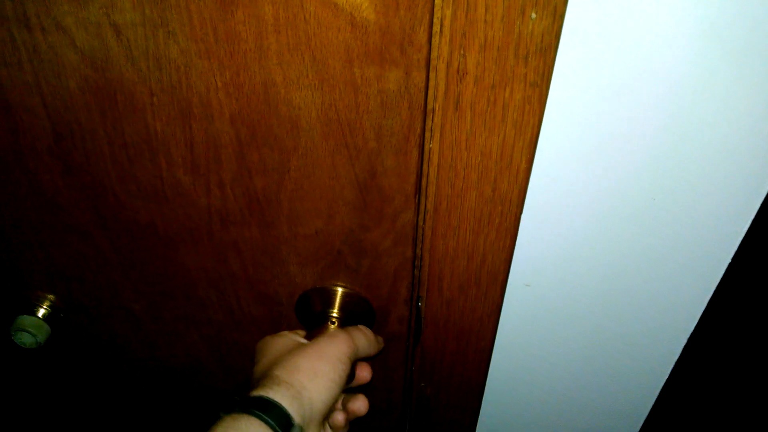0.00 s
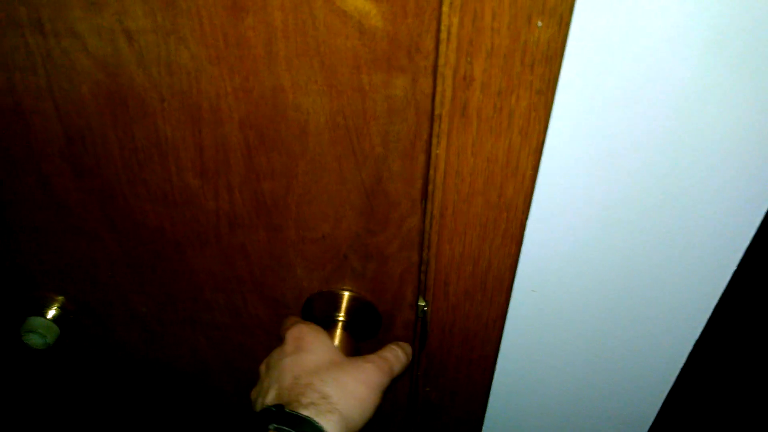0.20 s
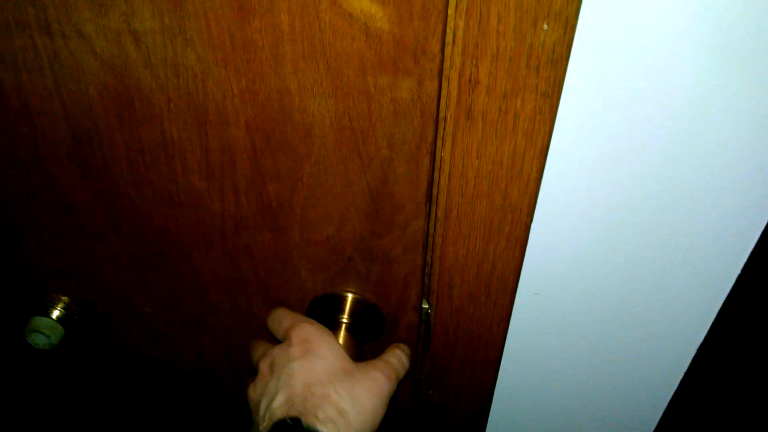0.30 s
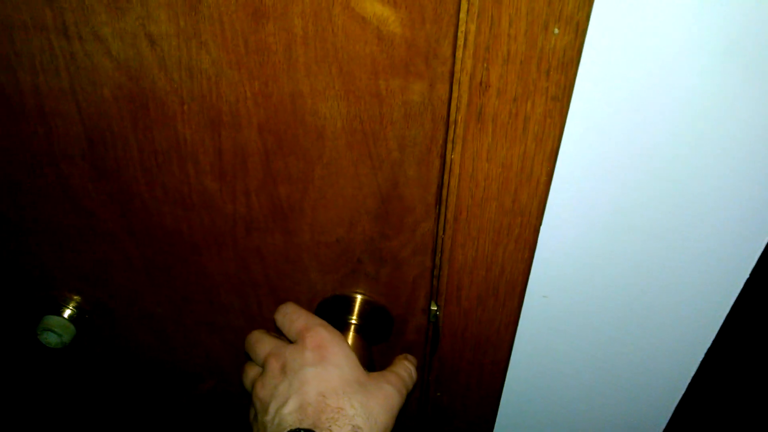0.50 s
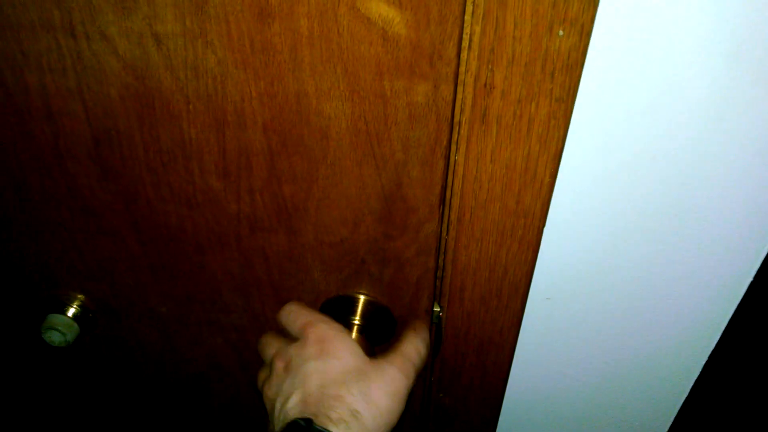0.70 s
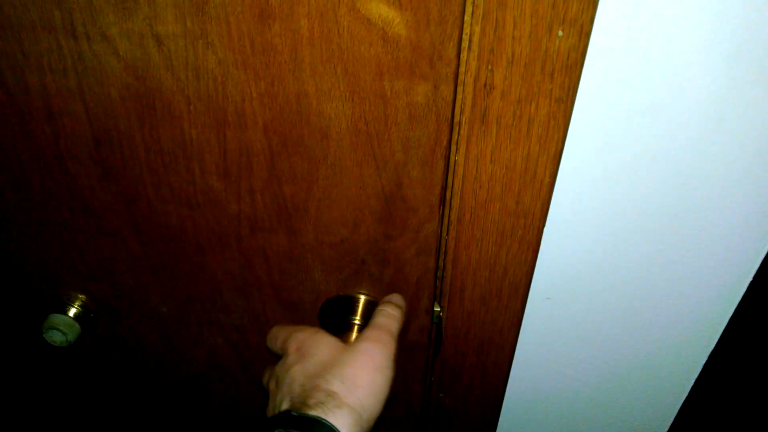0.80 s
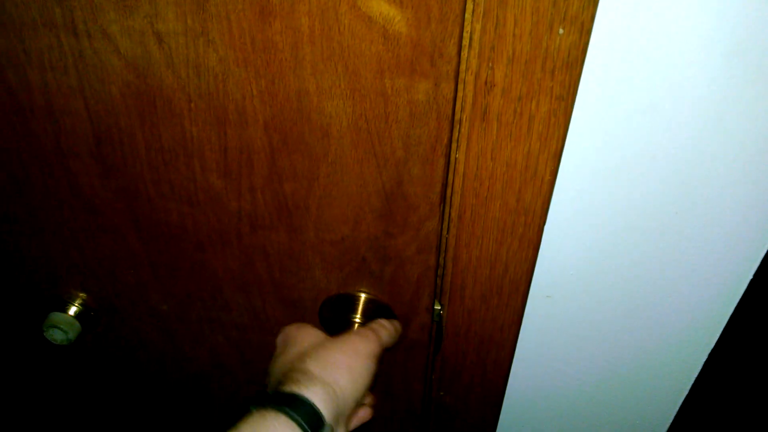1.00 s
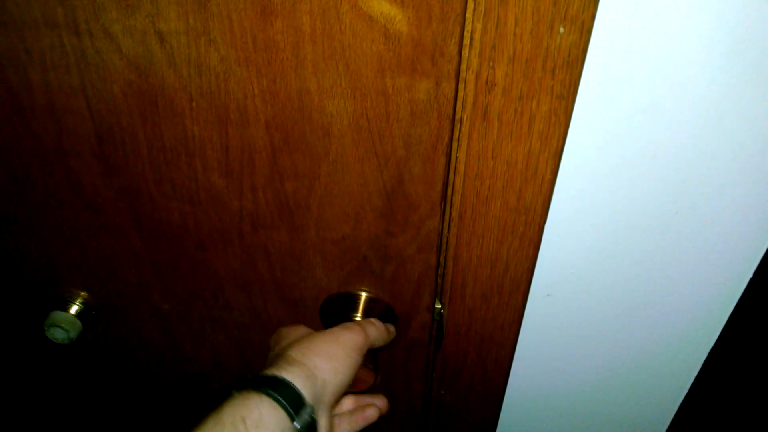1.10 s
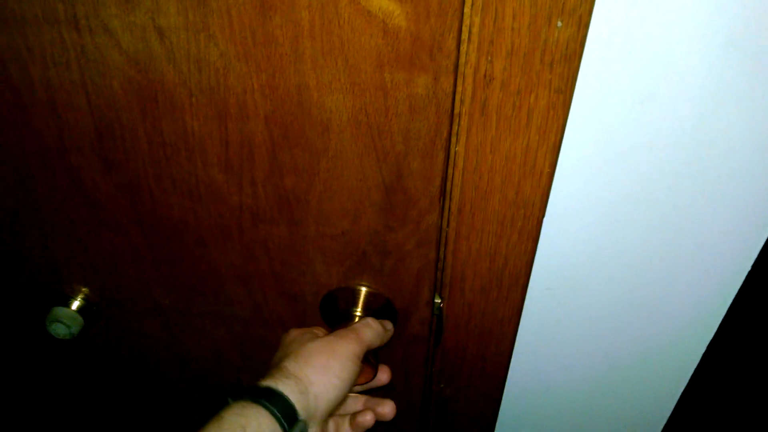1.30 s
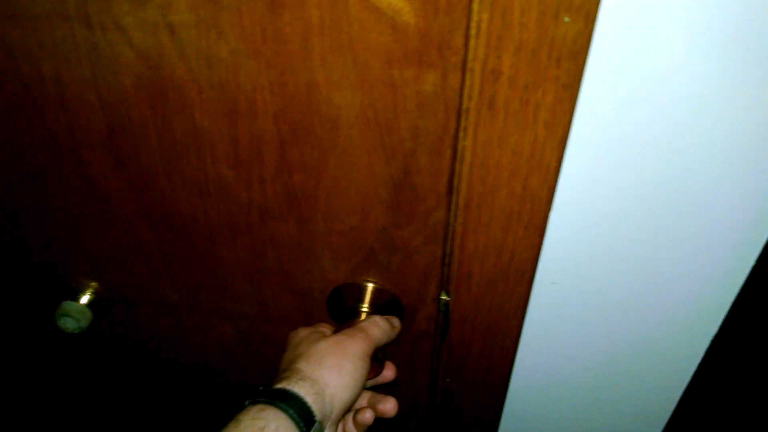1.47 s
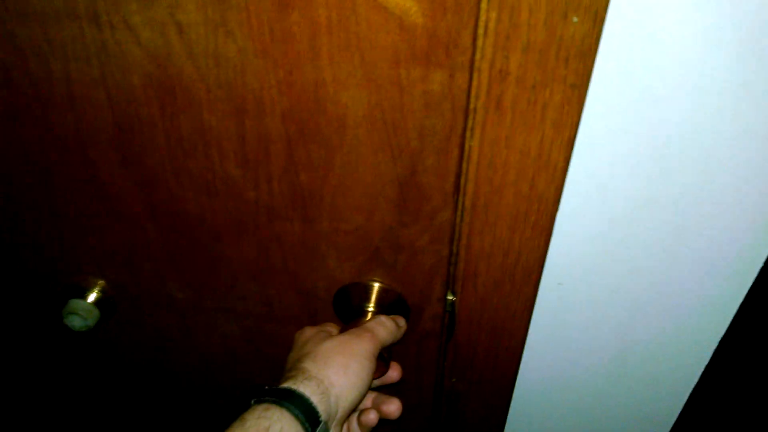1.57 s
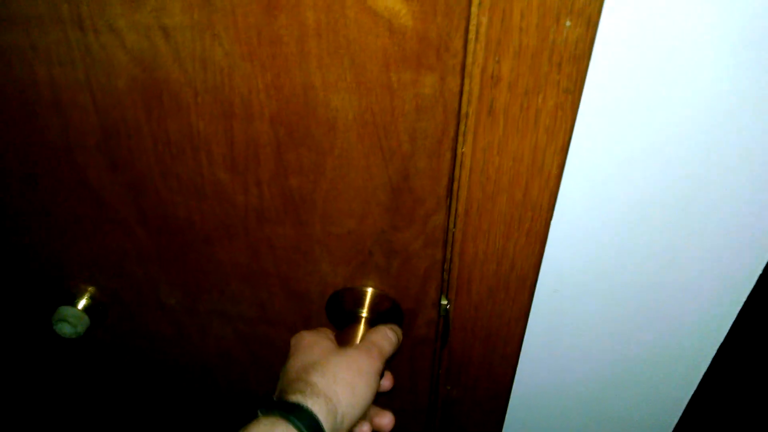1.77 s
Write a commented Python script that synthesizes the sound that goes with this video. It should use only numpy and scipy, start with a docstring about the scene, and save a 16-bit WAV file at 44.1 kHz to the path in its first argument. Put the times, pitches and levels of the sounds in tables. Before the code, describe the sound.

A brass doorknob on a stuck wooden door is worked close by in a small hallway, over steady low rumble and faint hiss. Light ticks and scraping start around 0.1 s; the latch snaps very loudly at 0.25 s, with a woody shudder and short echoes. After a quiet gap with faint ticks near 1.1 s, the knob rattles from 1.23 s, the bolt knocks at 1.46 s, and dull bumps end near 1.75 s.

```python
"""A brass knob is turned on a stuck wooden door, close by, in a small hallway.
A light tick and a rattle come first, over a steady room rumble and hiss; all of this hum is shaped noise.
Then the latch snaps once, hard, and the door shudders: damped sines, a sharp crack, echoes and a noisy ring.
About a second later the knob rattles and the bolt knocks in its plate, again ringing sines and noise.
Small ticks, dull bumps and the spindle's faint scrape, all from noise, lie around both moments."""
import sys
import numpy as np
from scipy import signal
from scipy.fft import rfft, irfft, next_fast_len
from scipy.io import wavfile

SR = 44100
rng = np.random.default_rng(int(sys.argv[2]) if len(sys.argv) > 2 else 0)


def generate_wav(signal):
    """Clip the signal to [-1, 1] and save it as 16-bit WAV at the path in sys.argv[1]."""
    frames = np.transpose(np.atleast_2d(signal))
    scaled = np.clip(frames, -1, 1) * 32767
    pcm = np.round(scaled).astype(np.int16)
    wavfile.write(sys.argv[1], SR, pcm)


N = 79380  # samples

# how alike the hallway's sound is at the two microphones: f/Hz, left-right correlation
HALL_LIKENESS = [(60, -0.35), (130, .3), (300, 0.72), (700, 0.77), (1400, 0.94), (3100, -0.41),
                 (8000, 0.27), (15000, 0.21)]
ONSET_S = 0.0005  # time constant with which every noisy ring and tap sets in


def amp(db):
    """Decibels to gain."""
    return 10 ** (np.asarray(db) / 20)


def seconds():
    """The time of each sample."""
    return np.arange(N) / SR


def fade(t60):
    """An exponential decay that falls 60 dB in t60 seconds."""
    return amp(-60 * seconds() / np.maximum(t60, .0005))


def rise(time_constant):
    """An exponential approach from silence to full level."""
    return 1 - np.exp(-seconds() / time_constant)


def along(points, hz):
    """(Hz, value) points read on a log frequency axis."""
    f, value = np.transpose(points)
    return np.interp(np.log(hz + 1), np.log(f + 1), value)


def filtered(x, response):
    """x shaped by a complex response of frequency."""
    m = next_fast_len(N + SR // 10)
    spectrum = rfft(x, m) * response(np.fft.rfftfreq(m, 1 / SR))
    return irfft(spectrum, m)[..., :N]


def at(s, x):
    """x delayed so that it starts at s seconds."""
    return np.pad(x, ((0, 0), (max(round(s * SR), 0), 0)))[:, :N]


def toward_right(db):
    """Gains that lower the left microphone and raise the right by db each."""
    return amp([[-db], [db]])


def noise(spectrum, alike):
    """Coloured stereo noise of rms 1; the mid-side balance sets how alike the microphones are."""
    def mid_side(hz):
        turn = np.arccos(np.clip(along(alike, hz), -1, 1)) / 2
        return amp(along(spectrum, hz)) * np.array([np.cos(turn), np.sin(turn)])

    mid, side = filtered(rng.standard_normal((2, N)), mid_side)
    pair = np.array([mid + side, mid - side])
    return pair / np.sqrt(np.mean(pair ** 2))


def ring(modes):
    """Damped sines struck at time zero, as each microphone hears them."""
    skew_rad = 0.36  # phase shift at each microphone, in opposite senses
    out = np.zeros((2, N))
    for i, (hz, db, t60) in enumerate(modes):
        skew = skew_rad * (-1) ** i
        phase = 2 * np.pi * hz * seconds() + np.array([[-skew], [skew]])
        out += amp(db) * fade(t60) * np.sin(phase)
    return out


def crack():
    """The bare contact: one very short push and pull."""
    n = np.arange(N)
    push = np.exp(-n / 2) * np.sin(n * np.pi / 4 + np.pi / 4)
    return np.diff(push, prepend=0)


def direct(x):
    """Sound straight from the lock reaches the right microphone first."""
    right_lead_s = .000022
    return filtered(x, lambda hz: np.exp(np.outer([-1j, 1j], np.pi * hz * right_lead_s)))


def diffuse(spectrum, damping=1):
    """Dense ringing of door and hallway; the bass builds slowly and the treble dies first."""
    # early reverberation of the hallway before damping: f/Hz, t60/s
    hall = [(100, 0.28), (400, 0.18), (1200, 0.16), (3000, 0.14), (8000, 0.12), (15000, 0.079)]
    late_db, late_stretch = -16.5, 4.13  # late part: its level, and how many times longer than hall
    chatter_db, chatter_per_s = 1, 360  # loose parts make the ringing uneven: spread, new levels a second
    build_cycles = 4.8  # time constant, in cycles, with which each pitch fills the door and hallway
    knots = rng.standard_normal(N // 10)
    chatter = amp(chatter_db * np.interp(seconds() * chatter_per_s, np.arange(len(knots)), knots))
    hz, t, z = signal.stft(noise(spectrum, HALL_LIKENESS) * chatter, SR, nperseg=256)
    fall_db = -60 * t / along(hall, hz)[:, None]
    decay = amp(damping * fall_db) + amp(late_db + fall_db / late_stretch)
    # half a bin and half a hop are added so that nothing starts at exactly zero
    build = 1 - np.exp(-np.outer(hz + hz[1] / 2, t + t[1] / 2) / build_cycles)
    ringing = signal.istft(z * decay * build, SR, nperseg=256)[1][:, :N]
    return ringing * rise(ONSET_S)


def taps(events, spectrum, t60):
    """Light contacts: bursts of coloured noise that die away quickly."""
    out = np.zeros((2, N))
    for s, db in events:
        burst = noise(spectrum, HALL_LIKENESS) * fade(t60) * rise(ONSET_S)
        out += amp(db) * at(s, burst)
    return out


def strikes(events, modes, spectrum, crack_db, ring_db, damping=1):
    """Each contact rings a body anew, its modes 1 dB uneven, low-passed at the contact's brightness."""
    out = np.zeros((2, N))
    for s, db, bright_hz in events:
        struck = [(hz, level + rng.normal(0, 1), t60) for hz, level, t60 in modes]
        blow = direct(ring(struck) + amp(crack_db) * crack())
        blow = blow + amp(ring_db) * diffuse(spectrum, damping)

        def dulling(hz):
            return 1 / (1 + np.sqrt(2) * 1j * hz / bright_hz - (hz / bright_hz) ** 2)

        out += amp(db) * filtered(at(s, blow), dulling)
    return out


def room_floor():
    """The room's rumble and hiss, steady noise at both microphones."""
    # colour of the empty hallway: f/Hz, relative level/dB per Hz
    floor_colour = [(20, -4), (45, -1), (80, 4.5), (115, -13), (160, -1), (260, -6), (330, -4), (450, -9.5),
                    (620, -12), (900, -21), (1700, -26), (2200, -32), (2550, -48), (3200, -24.5),
                    (5000, -34), (6500, -30), (10000, -32.5), (12500, -28.5), (14300, -27), (15500, -32.5)]
    # how alike the microphones hear it: f/Hz, left-right correlation
    floor_likeness = [(30, 0.22), (70, -0.47), (130, 0.25), (290, 0.46), (640, 0.71), (1410, 0.74),
                      (3100, -0.29), (7000, 0.024), (15000, 0.023)]
    return amp(-47) * noise(floor_colour, floor_likeness) * toward_right(0.07)


def sway():
    """The whole door rocks slowly and pushes the air: one low damped sine per sway."""
    # sways of the door: t/s, level/dB ahead of the tilt to the right
    sways = [(0.248, -39), (1.438, -36.5)]
    sway_hz, sway_t60_s, sway_rise_s = 26.9, 0.603, .02
    swing = direct(ring([(sway_hz, 0, sway_t60_s)]) * rise(sway_rise_s))
    return sum(amp(db) * at(s, swing) for s, db in sways) * toward_right(2.5)


def bumps():
    """The door bumps dully in its frame: short bursts of low noise."""
    # bumps: t/s, level/dB
    bump_events = [(.258, -32.5), (.335, -39), (.385, -47), (.46, -64), (.535, -59), (1.36, -39),
                   (1.515, -39.5), (1.558, -45.5), (1.721, -32.5), (1.731, -36), (1.762, -37)]
    # colour of a bump: f/Hz, relative level/dB per Hz
    bump_colour = [(25, 12), (70, -18.5), (110, -12), (160, 10), (260, -10), (550, -4.5), (900, -26),
                   (2500, -33), (8000, -50)]
    return taps(bump_events, bump_colour, t60=0.091)


def ticks():
    """Light brass ticks in the knob: short bursts of bright noise."""
    # ticks: t/s, level/dB
    tick_events = [(.115, -46), (.222, -69), (.357, -50), (1.115, -52), (1.363, -50), (1.4435, -43.5),
                   (1.448, -43.5)]
    # colour of a tick: f/Hz, relative level/dB per Hz
    tick_colour = [(200, -12), (2000, -14), (4200, -2), (6000, -4), (9500, -2), (12500, -1), (14200, -1),
                   (16000, -3)]
    return taps(tick_events, tick_colour, t60=.035)


def scrape():
    """The spindle slides brass on brass: thin noise in short swells."""
    # scrapes: t/s, length/s, level/dB at the height of the swell
    scrapes = [(0.197, 0.15, -50), (0.337, 0.071, -56), (1.099, .05, -57), (1.34, 0.077, -62),
               (1.69, 0.19, -57.5)]
    # colour of the scraping: f/Hz, relative level/dB per Hz
    scrape_colour = [(500, -22), (6000, -21), (12500, 1), (14200, 14), (16000, -13)]
    swell = np.zeros(N)
    for s, length, db in scrapes:
        progress = np.clip((seconds() - s) / length, 0, 1)
        swell += amp(db) * np.sin(np.pi * progress)
    return swell * noise(scrape_colour, HALL_LIKENESS)


def rattle():
    """The loose knob takes up its play on the spindle, damped by the hand."""
    # rattles: t/s, level/dB, brightness f/Hz
    rattles = [(.173, -52, 5060), (.2235, -46.5, 5000), (.387, -49, 3000), (1.2325, -50, 4400),
               (1.241, -47.5, 2200), (1.358, -41, 2570), (1.364, -40.5, 2500), (1.374, -36, 1300),
               (1.3985, -41, 2940), (1.4025, -37.5, 1580), (1.592, -57, 2170), (1.693, -55.5, 2000)]
    # modes of the gripped knob: f/Hz, level/dB, t60/s
    knob_modes = [(870, 1, 0.036), (957, -4.5, .025), (1244, 3.5, 0.013), (1536, -1.5, 0.0089),
                  (1920, 4, 0.0073), (3300, 9, 0.0022)]
    # colour of the knob's noisy ring: f/Hz, relative level/dB per Hz
    knob_colour = [(60, -18), (200, -14), (500, 5), (860, -4.5), (1400, 1.5), (2000, -8.5), (2550, -11.5),
                   (3500, -13), (5000, -12), (8000, -19), (15500, -28)]
    # the grip makes the early part of the noisy ring die 2.1 times faster
    return strikes(rattles, knob_modes, knob_colour, crack_db=14, ring_db=2, damping=2.1)


def knocks():
    """The bolt hits its plate and the door answers with its modes and a noisy ring."""
    # knocks: t/s, level/dB, brightness f/Hz
    knock_events = [(.277, -31.5, 2000), (.283, -40.5, 1920), (1.4598, -44, 1530), (1.463, -27.5, 14000),
                    (1.522, -49, 2000)]
    # modes of bolt and door together: f/Hz, level/dB, t60/s
    bolt_modes = [(275, -21, .3), (334.3, -15.5, 0.32), (411.4, -10.5, 0.33), (518, -0.5, 0.12),
                  (629, -14, 0.21), (692.5, -5.5, 0.098), (1133, -5.5, 0.17), (1126, -1.5, 0.07),
                  (1323, -8.5, 0.16), (1705, -7, 0.073), (1816, 3.5, 0.044), (1880, 1, 0.022),
                  (3340, 12, 0.0065), (9570, -3, 0.0076), (11430, 7.5, 0.0077), (13940, -13, 0.0048)]
    # colour of a knock's noisy ring: f/Hz, relative level/dB per Hz
    knock_colour = [(60, 13), (160, 2), (300, 7.5), (520, 4), (880, -0.5), (1200, 3.5), (1900, -2),
                    (2550, -19.5), (3400, -1.5), (4500, -10), (5300, -23), (6200, -9.5), (8000, -27),
                    (9600, -13.5), (10500, -30), (11600, -8), (12800, -22), (14000, -12), (15500, -38)]
    return strikes(knock_events, bolt_modes, knock_colour, crack_db=8, ring_db=2)


def snap():
    """The latch lets go: a brass crack, its echoes, the spring and the shaken panel."""
    # brass modes of the latch: f/Hz, level/dB, t60/s
    latch_modes = [(2050, -3, 0.0066), (3035, 4.5, 0.0044), (3360, 8.5, 0.0044), (7700, -32.5, 0.0028),
                   (9160, 2, 0.0032), (13900, -5.5, 0.0056)]
    # thin after-ring of the latch spring: f/Hz, level/dB, t60/s
    spring_modes = [(2657, -27, .11), (3031, -28, .12), (3195, -27, .12), (3403, -24, .12),
                    (3893, -32, .14), (9283, -33, .1)]
    # the door panel shaken by the snap: f/Hz, level/dB, t60/s
    panel_modes = [(72, -36.5, 0.16), (152, -36.5, 0.86), (246.6, -26.5, 0.22), (376.3, -22, 0.34),
                   (403, -19, .24), (428, -24.5, 0.14), (539, -30.5, .26), (707, -24, 0.11),
                   (860, -26, 0.2), (1090, -30, 0.11), (1102, -22.5, .17), (1530, -24, 0.068)]
    # nearby walls return the snap: delay t/s, level/dB
    wall_echoes = [(.0021, -8), (.0058, -17), (0.0091, -17), (.0148, -7)]
    # colour of the snap's noisy ring: f/Hz, relative level/dB per Hz
    snap_colour = [(60, -9), (160, -4), (300, 2), (400, 8), (600, -7), (900, -10), (1200, 1.5),
                   (1900, -1.5), (2400, -8), (2900, 0.5), (3500, 0), (4400, -6.5), (5300, -15),
                   (6300, -9.5), (7900, -18), (9300, -9.5), (10400, -16), (11400, -7), (12700, -24),
                   (14000, -10), (15500, -19)]
    snap_s, snap_db, crack_db, ring_db = .2467, -7, -5.5, -13.5
    latch_rise_s, panel_rise_s = 0.0005, 0.0024
    brass = direct(ring(latch_modes) * rise(latch_rise_s) + amp(crack_db) * crack())
    echoes = sum(amp(db) * at(delay, brass) for delay, db in wall_echoes)
    body = direct(ring(spring_modes) + ring(panel_modes) * rise(panel_rise_s))
    tail = amp(ring_db) * diffuse(snap_colour)
    return amp(snap_db) * at(snap_s, brass + echoes + body + tail)


def scene():
    """The door, a little to the right of the microphones, over the room's floor."""
    floor = room_floor()
    door = sway() + bumps() + ticks() + scrape() + rattle() + knocks() + snap()
    return floor + door * toward_right(0.38)


def record(dry):
    """The recorder clips at full scale and keeps nothing above its band limit."""
    top_hz, slope_hz = 15600, 400  # middle and width of the cutoff
    return filtered(np.clip(dry, -1, 1), lambda hz: np.clip((top_hz - hz) / slope_hz + .5, 0, 1))


dry = scene()
out = record(dry)
generate_wav(out)
```